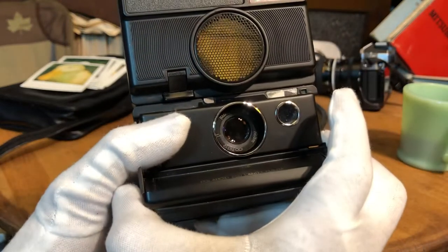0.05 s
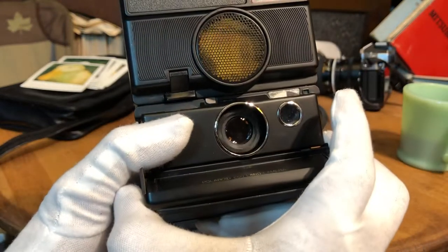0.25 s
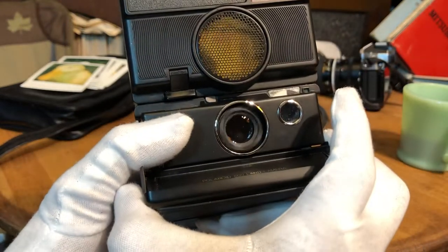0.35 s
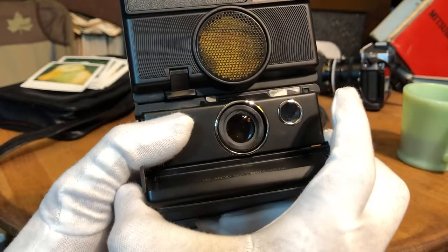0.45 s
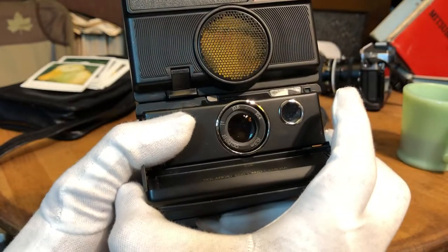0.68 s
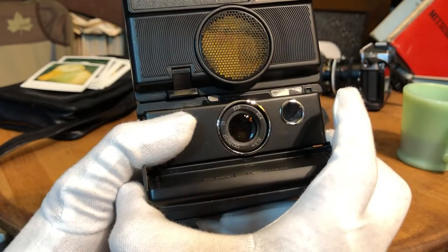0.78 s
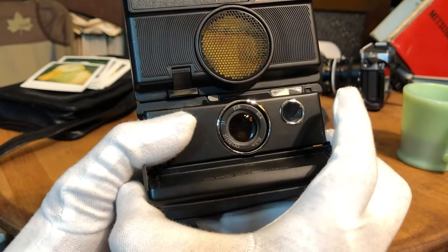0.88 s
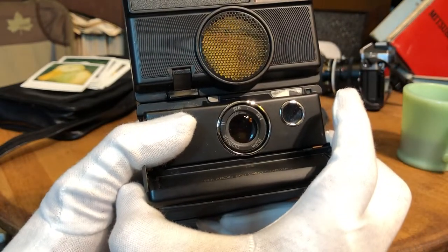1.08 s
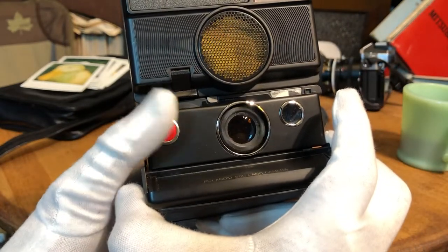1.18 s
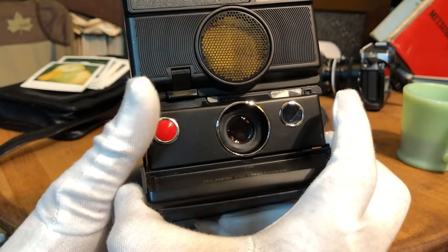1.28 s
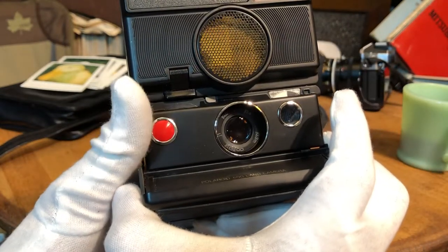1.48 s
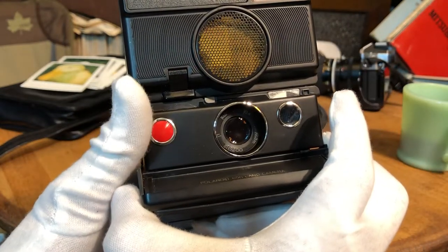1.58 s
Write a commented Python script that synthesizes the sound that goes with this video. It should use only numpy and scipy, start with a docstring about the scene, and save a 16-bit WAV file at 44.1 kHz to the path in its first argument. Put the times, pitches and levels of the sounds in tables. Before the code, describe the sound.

A small camera motor whirs briefly after a sharp tick and stops with a snap. After a short pause it whirs again and clicks to a stop, heard up close in a quiet small room.

```python
"""A small room: a folding instant camera, held close in gloved hands, focuses and lets go.
Its sonar ranger ticks, a small motor spins up and drives the lens through plastic gears,
and a pawl stops it with a snap. On release of the button the motor winds the lens back
against its end stop. A small metal part rings after each stop.
Underneath lie room air and a faint low wavering tone near 70 Hz."""
import sys
import numpy as np
from scipy import signal
from scipy.fft import rfft, irfft
from scipy.io import wavfile

SR = 44100
rng = np.random.default_rng(int(sys.argv[2]) if len(sys.argv) > 2 else 0)


def put_to_file(sound):
    """Save the sound as 16-bit audio at rate SR, in the file named by the first command-line argument."""
    columns = np.atleast_2d(sound).T  # one column per channel
    safe = np.clip(columns, -1, 1)
    whole_steps = np.round(safe * 32767)
    wavfile.write(sys.argv[1], SR, whole_steps.astype(np.int16))


N = 72765

# motor runs, lens out then back: start/s, stop/s, rattle/dB, whistle/dB, whistle f/Hz, run-down tau/s
RUNS = [(0.227, 0.485, -38.5, -56, 7060, 0.022), (1.089, 1.37, -36, -54.5, 7130, 0.013)]
GEAR_RATIO = 4  # shaft turns per gear turn


def undb(db):
    """Decibels to gain."""
    return 10 ** (np.asarray(db) / 20)


def unit(x):
    """Scale to rms 1."""
    return x / np.sqrt(np.mean(x ** 2))


def noise():
    """White noise."""
    return rng.standard_normal(N)


def butter(x, order, hz, kind):
    """Causal Butterworth filter."""
    return signal.sosfilt(signal.butter(order, hz, kind, fs=SR, output="sos"), x)


def drift(rate_hz):
    """Smooth random drift, rms 1."""
    return unit(butter(noise(), 2, rate_hz, "low"))


def band(x, hz, width_hz):
    """Resonance, gain 1 at its centre."""
    return signal.lfilter(*signal.iirpeak(hz, hz / width_hz, fs=SR), x)


def colour(x, points, tilt_db_oct=0):
    """Minimum-phase filter of unit power, shaped by (f/Hz, level/dB) points and a tilt."""
    hz, db = np.array(points).T
    octave = np.log2(np.maximum(np.fft.rfftfreq(2 * N, 1 / SR), 1))
    tilt_db = tilt_db_oct * np.maximum(octave, np.log2(hz[0]))
    gain = unit(undb(np.interp(octave, np.log2(hz), db) + tilt_db))
    cepstrum = irfft(np.log(gain))
    cepstrum[1:N] *= 2
    cepstrum[N + 1:] = 0
    return irfft(rfft(x, 2 * N) * np.exp(rfft(cepstrum)))[:N]


def background(t):
    """Quiet room air and a faint low wavering tone near 70 Hz."""
    # air spectrum: f/Hz, relative level/dB
    air_shape = [(20, -22), (32, -15.5), (48, 1.5), (62, -6), (100, -8), (240, -7.5), (450, -13),
                 (550, -15.5), (800, -18.5), (1300, -22), (4000, -30), (10000, -31), (16000, -37)]
    # low tone envelope: t/s, level/dB
    low_tone_levels = [(0, -62), (.15, -69.5), (.45, -72.5), (1.0, -77.5), (1.45, -75), (1.65, -68)]
    low_tone_hz = 69.8 * (1 + 0.0085 * drift(6.9))
    low_tone = np.sqrt(2) * np.sin(2 * np.pi * np.cumsum(low_tone_hz) / SR)
    air = undb(-67) * unit(colour(noise(), air_shape))
    return air + low_tone * undb(np.interp(t, *np.array(low_tone_levels).T))


def gloves(t):
    """Gloved fingers shift on the plastic body in soft swells of noise."""
    # rubs: peak t/s, 1/e half-width/s, level/dB, tilt/(dB/oct)
    rubs = [(0.044, 0.046, -66, -1.5), (0.157, 0.051, -67.5, -1), (0.539, 0.0092, -56, 3),
            (.785, 0.011, -62.5, -2), (1.56, 0.026, -74.5, -1), (1.636, 0.027, -69.5, -2)]
    # cloth-on-plastic spectrum: f/Hz, level/dB
    rub_shape = [(60, -3.5), (300, -17), (1000, -21), (4000, -20), (16000, -33)]
    return sum(colour(noise(), rub_shape, tilt) * undb(db) * np.exp(-((t - at_s) / width_s) ** 2)
               for at_s, width_s, db, tilt in rubs)


def sonar(t):
    """The ranger's foil ticks at both ends of its burst and settles with a falling thump."""
    start_s, burst_s = .2195, .0011
    thump_hz, fall_s, decay_s = 2300, 0.000626, 0.0068
    edges = np.zeros(N)
    edges[int(start_s * SR)] = 1
    edges[int((start_s + burst_s) * SR)] = -undb(-3.5)
    ticks = colour(edges, [(500, -22), (3000, 3), (9000, 6), (16000, 5)])
    age = np.maximum(t - start_s, 0)
    thump = np.sin(2 * np.pi * thump_hz * fall_s * np.log1p(age / fall_s)) * np.exp(-age / decay_s)
    return undb(-14.5) * ticks + undb(-37.5) * thump


def motor(t, way, start_s, stop_s, rattle_db, whistle_db, whistle_hz, run_down_s):
    """One run (way 0 out, 1 back): whine and gear noise grow as the shaft spins up."""
    # shaft per run: top speed/Hz, spin-up tau/s, whine/dB
    shaft = [(387, .053, -40.5), (378, .036, -37.3)]
    top_hz, spin_up_s, whine_db = shaft[way]
    age = np.maximum(t - start_s, 0)
    speed = 1 - .5 * np.exp(-age / spin_up_s) * (t >= start_s)  # fraction of top speed
    gate = np.clip(age / 0.00195, 0, 1) * np.exp(-np.maximum(t - stop_s, 0) / run_down_s)
    shaft_rad = 2 * np.pi * np.cumsum(top_hz * speed * (1 + .0035 * drift(60))) / SR
    whine = undb(whine_db) * shaft_whine(shaft_rad, way) * speed ** 1.7
    rattle, whistle = gear_noise(gear_teeth(shaft_rad, speed), way, whistle_hz)
    gears = (undb(rattle_db) * rattle + undb(whistle_db) * whistle) * speed ** 1.8
    return gate * np.array([whine, gears])


def shaft_whine(shaft_rad, way):
    """Shaft harmonics climb into a panel resonance; the eccentric gear makes them throb."""
    # whine partials: multiple of shaft rate, level out/dB, level back/dB
    partials = [(1, -7, -24.5), (2, -20.5, -22.5), (3, -11.5, -10.5), (4, -11, -14), (5, -7.5, -18),
                (6, -3, -9.5), (7, -12, -31), (9, -7, -9.5), (11, -20.5, -23), (13, -22, -19.5)]
    flutter_db, throb_depth = 1.4, .35
    whine = 0
    for multiple, *levels_db in partials:
        gain = undb(levels_db[way] + flutter_db * drift(70))
        whine += gain * np.sin(multiple * shaft_rad + 2 * np.pi * rng.random())
    whine = butter(whine, 2, 780, "high")
    panel = undb(15) * band(whine, hz=1140, width_hz=80)
    return unit(whine + panel) * (1 + throb_depth * np.cos(shaft_rad / GEAR_RATIO))


def gear_teeth(shaft_rad, speed):
    """Tooth flaws repeat every gear turn; loose play adds fresh ticks."""
    points, repeat_share = 512, .35
    top_ticks_per_s, scatter_db = 8000, 1.8
    gear_turns = shaft_rad / (2 * np.pi * GEAR_RATIO)
    flaws = np.interp(gear_turns, np.arange(points) / points, rng.standard_normal(points), period=1)
    flaws = unit(butter(flaws, 4, 1100, "high"))
    ticks = rng.random(N) < top_ticks_per_s * speed / SR
    play = unit(ticks * np.sign(noise()) * undb(scatter_db * noise()))
    teeth = np.sqrt(repeat_share) * flaws * speed + np.sqrt(1 - repeat_share) * play
    return teeth * (1 + .25 * np.cos(shaft_rad))


def gear_noise(teeth, way, whistle_hz):
    """Tooth contacts rattle the lens housing; a thin whistle rides on top."""
    # rattle spectrum: f/Hz, level out/dB, level back/dB
    rattle_shape = [(147, -26.5, -30), (445, -15, -15), (699, -8.5, -8), (858, -1, -2.5), (1065, 1, 3),
                    (1500, -6.5, -2), (2500, -0.5, -5.5), (2960, -6, -3.5), (4830, -10, -7),
                    (6000, -15, -17.5), (10200, -21, -22.5), (16000, -25.5, -25.5)]
    # housing resonances: f/Hz, width/Hz, gain/dB
    housing = [(1140, 120, -4), (2380, 160, -7), (3410, 200, -1)]
    rattle = colour(teeth, [(hz, levels_db[way]) for hz, *levels_db in rattle_shape])
    rattle += sum(undb(db) * band(rattle, hz, width_hz) for hz, width_hz, db in housing)
    whistle = band(band(teeth, whistle_hz, width_hz=240), whistle_hz, width_hz=240)
    return unit(rattle), unit(whistle)


def clacks(t):
    """Pawl and gears chatter for a few milliseconds and ring the body."""
    # clacks: t/s, level/dB, hold/s, tilt/(dB/oct), ring re snap/dB
    hits = [(0.2273, -37.5, .001, -5, -18.5), (0.2296, -35, 0.0059, -1.5, -17),
            (0.4887, -17.5, .0021, 1.76, -18), (0.4923, -33, .0012, -5.5, -2),
            (0.531, -52, 0.0087, -3.5, -1.5), (0.562, -54.5, 0.0031, -4, -10),
            (1.0883, -56, 0.0013, -4, -1.5), (1.0901, -40, 0.0043, 1.5, -14),
            (1.126, -37.5, 0.0016, -10, -27), (1.3556, -22.5, 0.0037, -0.57, -17.5),
            (1.466, -66, 0.0065, -3.5, -7)]
    # contact spectrum: f/Hz, level/dB
    snap_shape = [(150, -40), (400, -18), (650, -12), (900, 0.5), (2000, 5), (3200, 5), (3900, -1),
                  (5000, 6.5), (6500, -2.5), (11000, -4.5), (16000, -9)]
    # body modes: f/Hz, level/dB, t60/s
    body_modes = [(949, 1, 0.058), (1214, 5.5, 0.041), (1312, -2, 0.039), (1750, 4.5, 0.03),
                  (2515, -5.5, 0.03), (2743, -5.5, 0.034), (3464, 4.5, .03), (5200, 1, 0.017),
                  (9150, -5, .018), (10400, -8, .025)]
    contacts_per_s, decay_s = 12000, 0.0013
    ring = sum(undb(db - 60 * t / t60) * np.sin(2 * np.pi * hz * t) for hz, db, t60 in body_modes)
    ring /= np.linalg.norm(ring)
    out = 0
    for at_s, db, hold_s, tilt, ring_db in hits:
        chatter = unit(np.sign(noise()) * (rng.random(N) < contacts_per_s / SR))
        envelope = (t >= at_s) * np.exp(-np.maximum(t - at_s - hold_s, 0) / decay_s)
        snap = undb(db) * colour(chatter * envelope, snap_shape, tilt)
        out += snap + undb(ring_db) * signal.fftconvolve(snap, ring)[:N]
    return out


def metal_ring(t):
    """A small metal part rings faintly after each stop, louder after the harder run."""
    hz, peak_db, t60_s = 1007, -65.5, 1.0
    hardest_db = max(rattle_db for _, _, rattle_db, *_ in RUNS)
    envelope = sum((t > stop_s) * undb(rattle_db - hardest_db - 60 * np.abs(t - stop_s) / t60_s)
                   for _, stop_s, rattle_db, *_ in RUNS)
    return undb(peak_db) * envelope * np.sin(2 * np.pi * hz * t)


def room(x, t):
    """Short diffuse reflections, longest in the midrange."""
    # reverberation bands: f/Hz, t60/s, level/dB
    bands = [(520, 0.13, -5), (1300, 0.19, -8), (3870, 0.15, -21.5), (10600, 0.11, -12)]
    build_up = np.clip((t - .002) / 0.0047, 0, 1)
    response = 0
    for hz, t60, db in bands:
        tail = build_up * undb(-60 * t / t60)
        response += undb(db) * band(noise(), hz, width_hz=hz) * tail / np.linalg.norm(tail)
    return signal.fftconvolve(x, response)[:N]


def scene():
    """Camera, reflections and background, mono."""
    t = np.arange(N) / SR
    whine, gears = sum(motor(t, way, *run) for way, run in enumerate(RUNS))
    body = gears + clacks(t) + gloves(t)
    ping = sonar(t)
    echoes = room(body + undb(-6) * whine + undb(-3.5) * ping, t)
    return (whine + body + metal_ring(t) + ping + echoes + background(t))[None]


def record(dry):
    """High-pass at 38 Hz, steep low-pass at 16.1 kHz."""
    low_pass = signal.ellip(10, .2, 70, 16100, fs=SR, output="sos")
    return signal.sosfilt(low_pass, butter(dry, 4, 38, "high"))


dry = scene()
out = record(dry)
put_to_file(out)
```